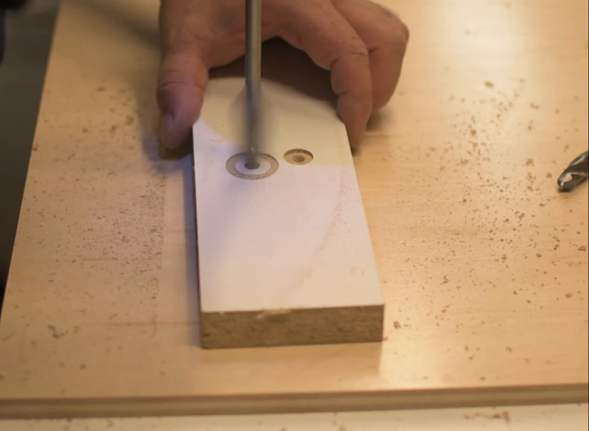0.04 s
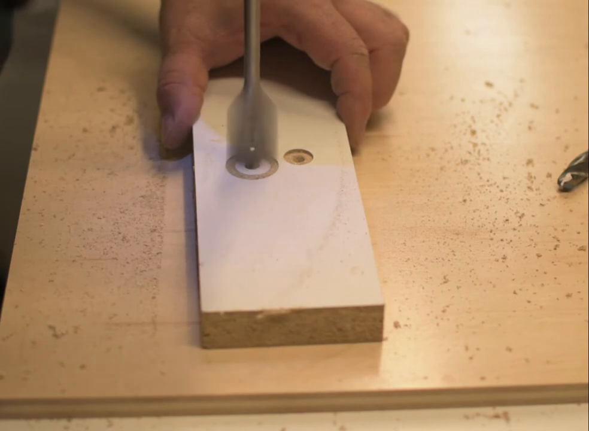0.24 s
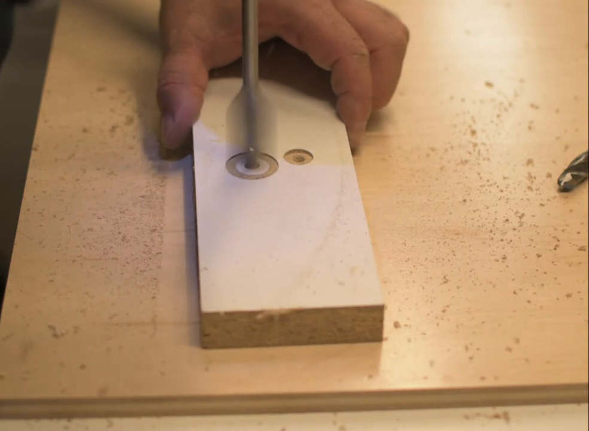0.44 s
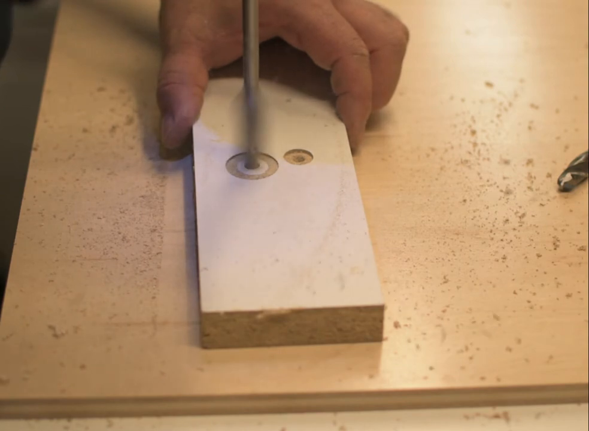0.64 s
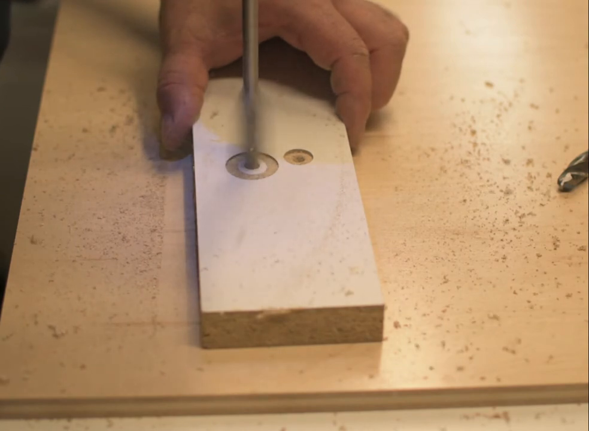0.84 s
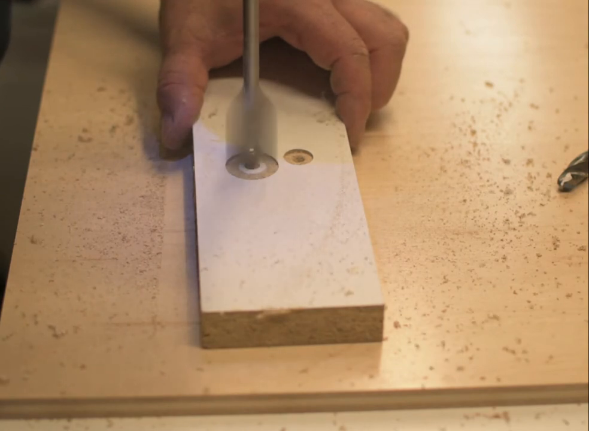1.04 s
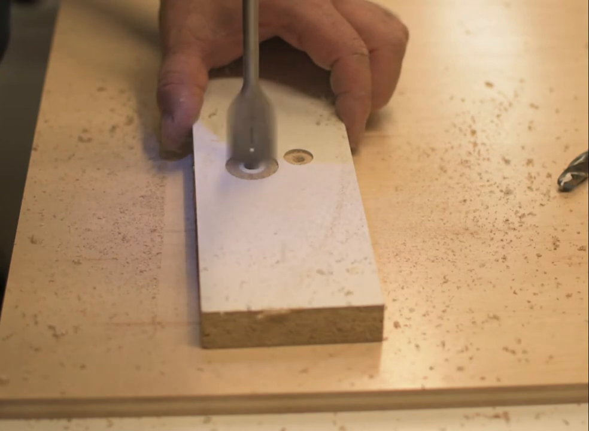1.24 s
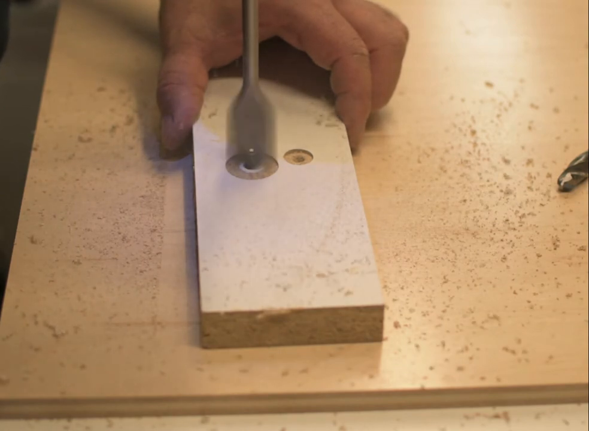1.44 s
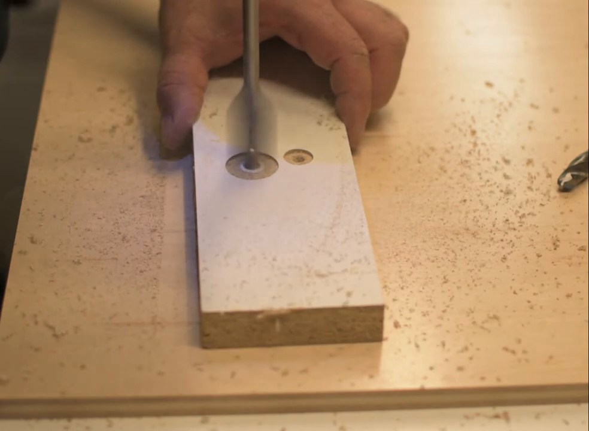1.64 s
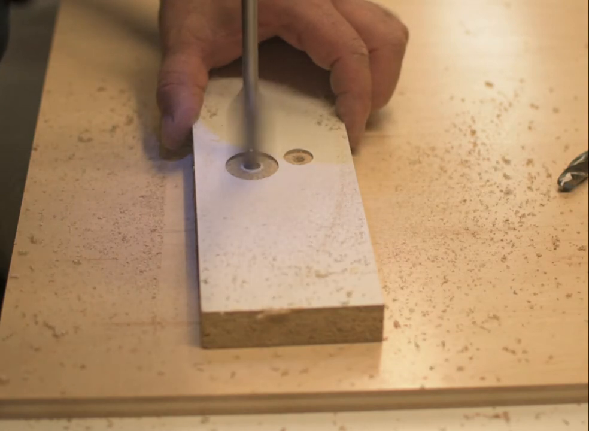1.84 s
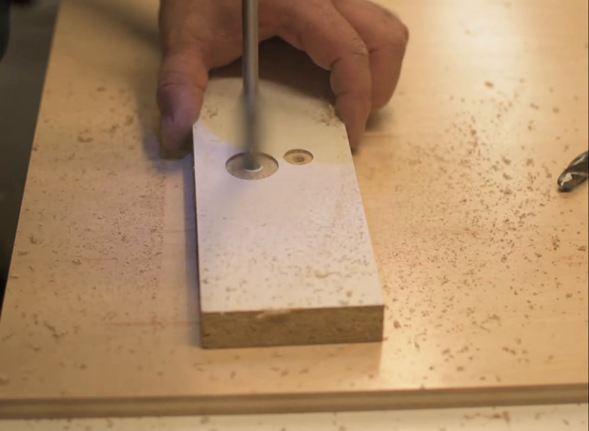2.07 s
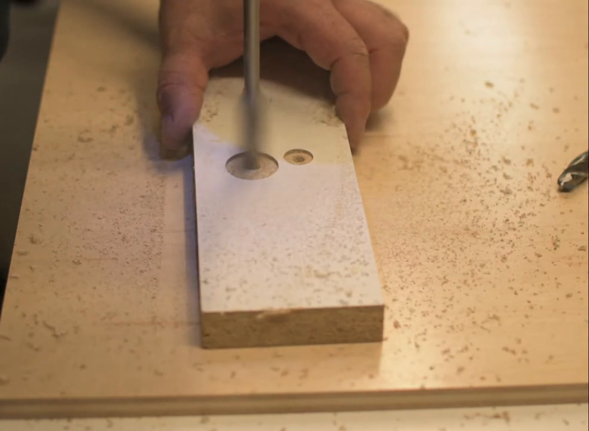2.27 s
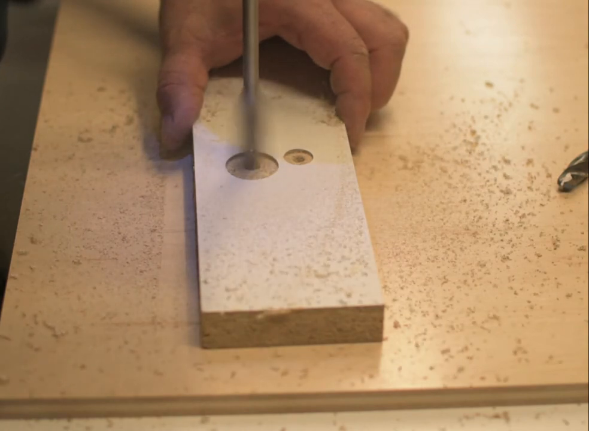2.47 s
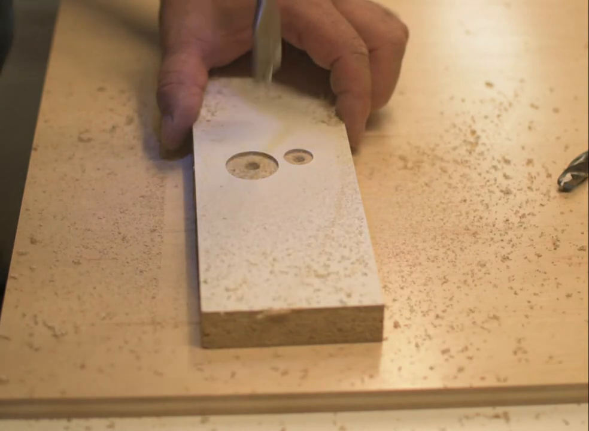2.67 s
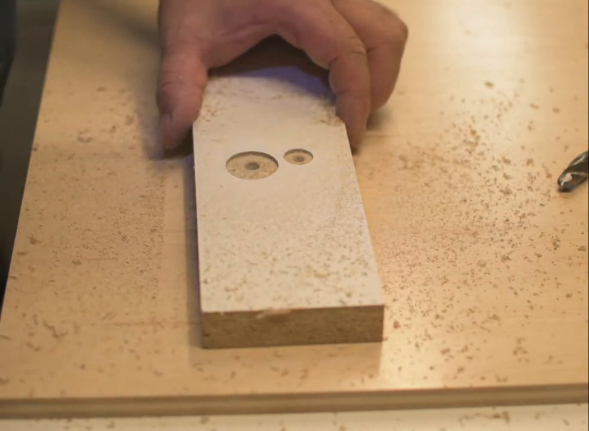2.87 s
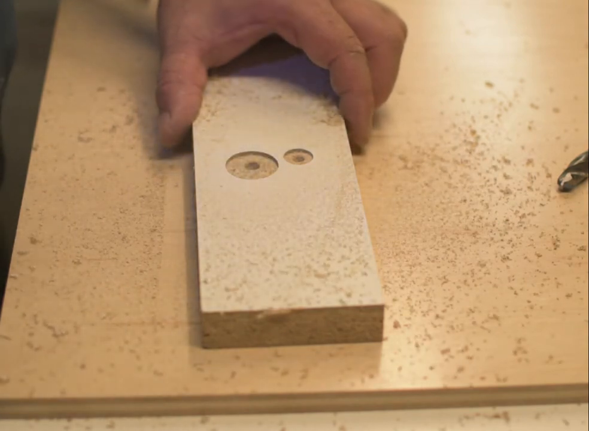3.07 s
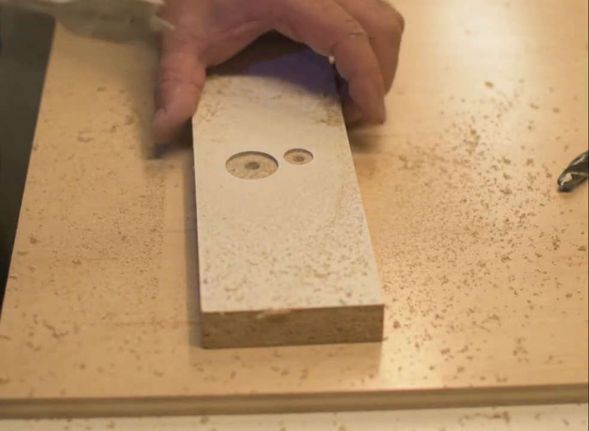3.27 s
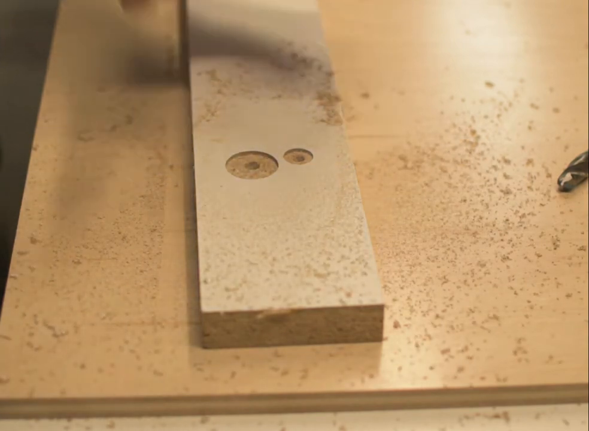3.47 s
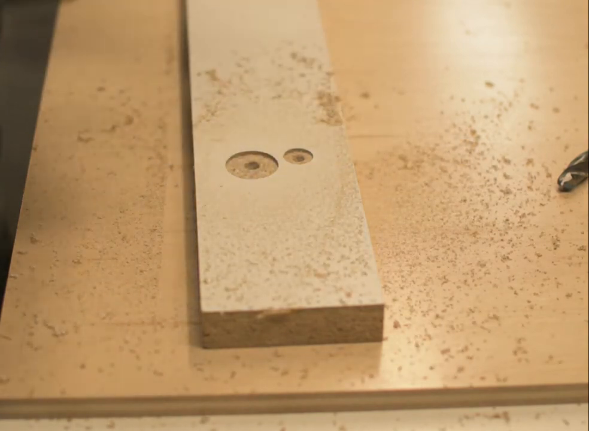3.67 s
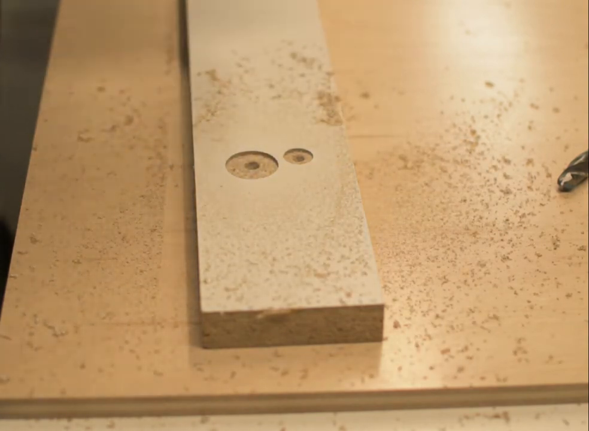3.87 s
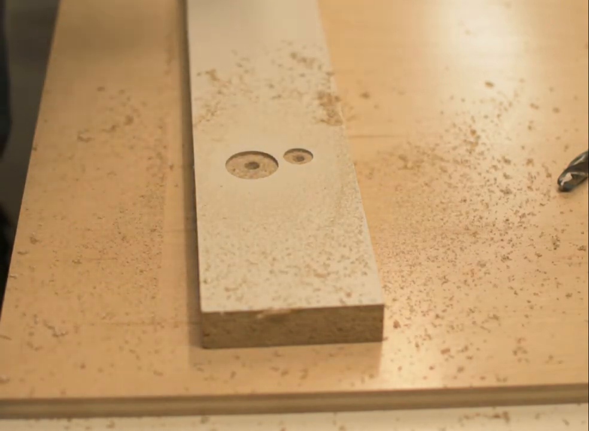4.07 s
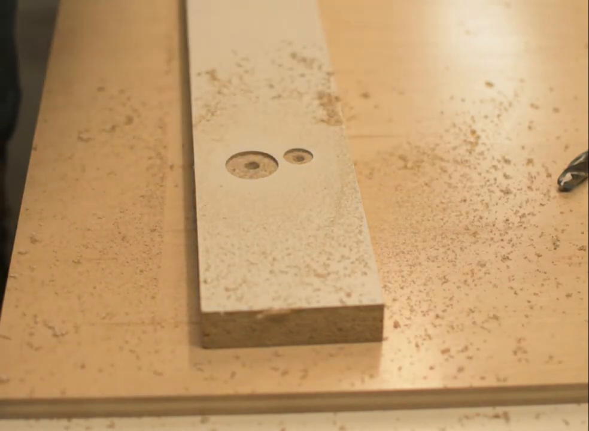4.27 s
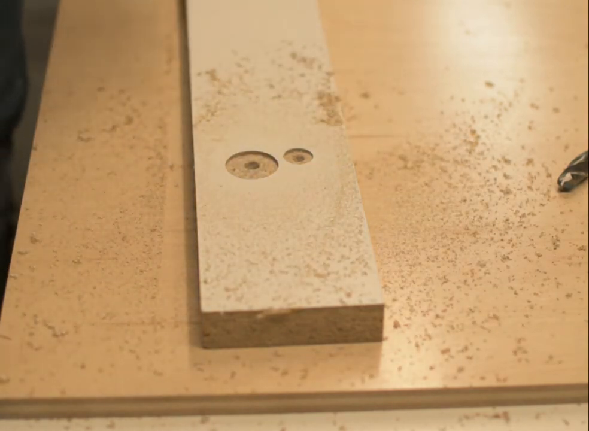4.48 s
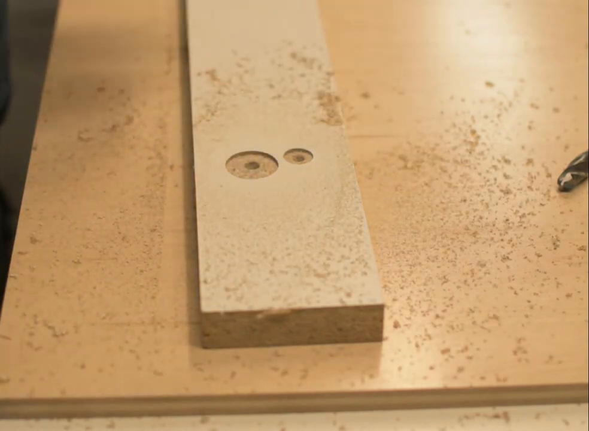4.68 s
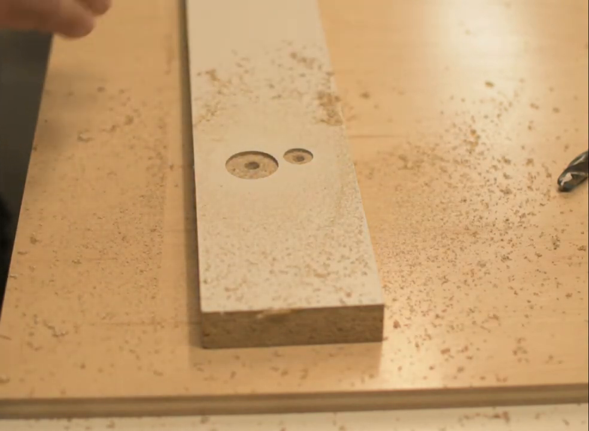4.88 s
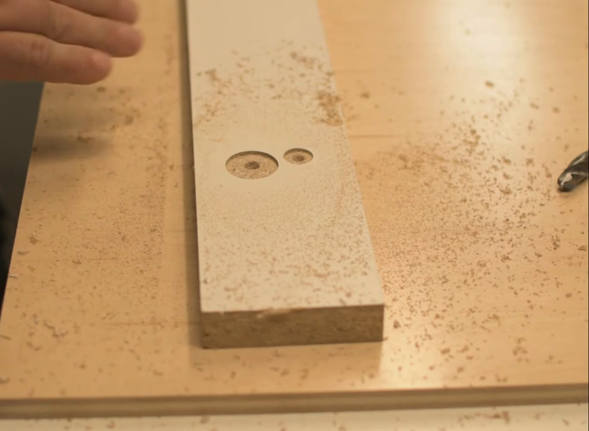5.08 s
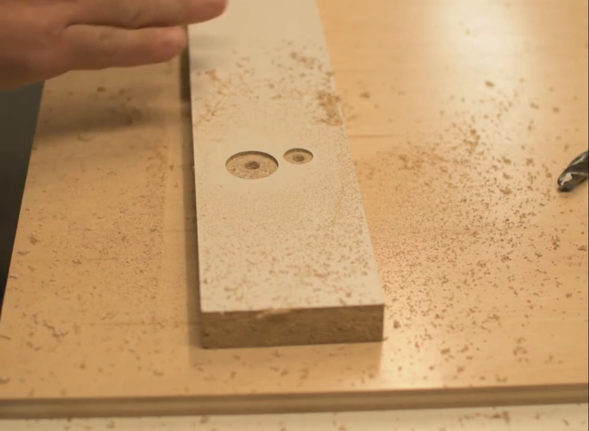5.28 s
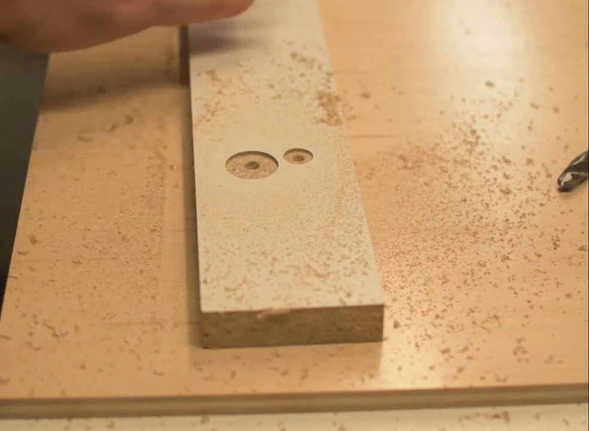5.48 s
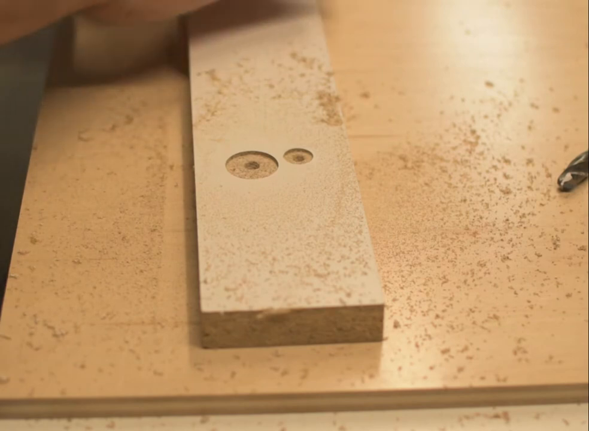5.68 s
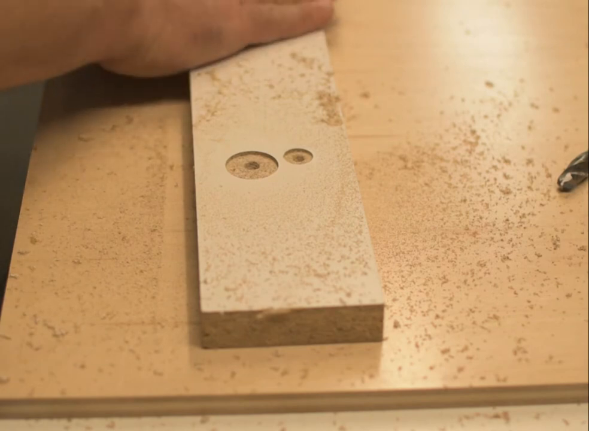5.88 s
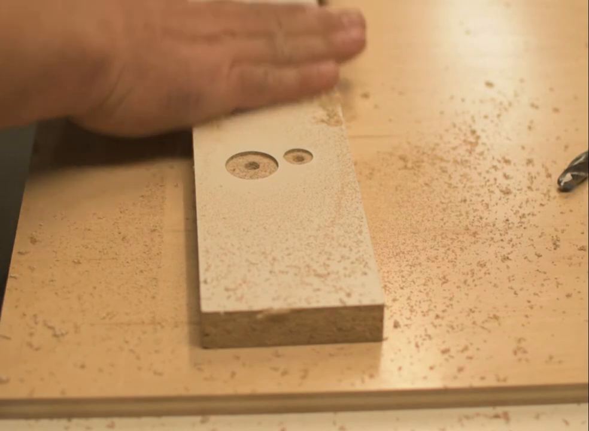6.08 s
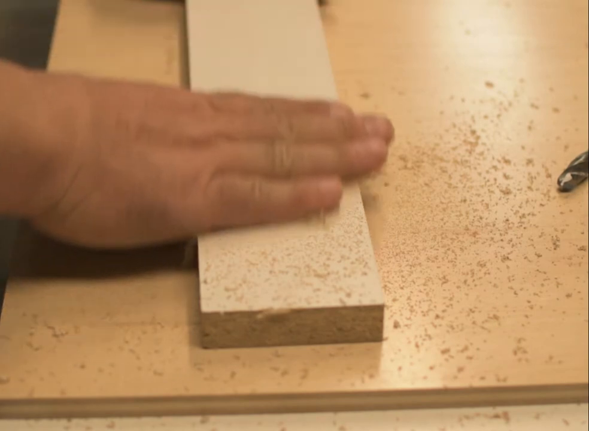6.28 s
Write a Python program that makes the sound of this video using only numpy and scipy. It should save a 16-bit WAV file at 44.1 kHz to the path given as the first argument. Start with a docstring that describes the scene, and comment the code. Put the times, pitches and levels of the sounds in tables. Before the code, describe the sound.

An electric drill whines and grinds into wood, brakes with a clack, then a few short knocks sound on a workbench.

```python
"""A hand drill boring a board with a spade bit, on the bench of a small workshop, mono microphone close by.
The motor roars and whines, the bit's two edges bite the wood in turn, its steel rings and squeals, and the
gears clack as it brakes. The drill is handled and put down, a dog barks twice far off, and a palm starts
to sweep away the sawdust. The room answers the tool and the bench; the recorder clips the loudest peaks."""
import sys
import numpy as np
from scipy import signal
from scipy.fft import rfft, irfft, next_fast_len
from scipy.io import wavfile
from scipy.ndimage import uniform_filter1d, map_coordinates

SR = 44100
rng = np.random.default_rng(int(sys.argv[2]) if len(sys.argv) > 2 else 0)


def unload_audio(sound):
    """Save the sound as a 16-bit wav file, at the path given as the first command line argument."""
    columns = np.transpose(np.atleast_2d(sound))
    # keep every value between -1 and 1, then stretch to whole-number steps
    steps = np.round(np.clip(columns, -1, 1) * 32767)
    wavfile.write(sys.argv[1], SR, steps.astype(np.int16))


N = 278712
TIME = np.arange(N) / SR
# spectrum of fan, brushes and gears: f/Hz, level/dB
ROAR_SPECTRUM = [(590, -27.5), (1000, -3.5), (1300, -12), (1600, -5), (1950, -8.5), (2680, -3.5),
                 (2910, -3), (3570, -1), (4550, -3.5), (7700, -8), (9050, -7.5), (10700, -13), (15500, -18)]
# resonances of the board: f/Hz, width/Hz, level/dB
BOARD_MODES = [(200, 19, -9.5), (511, 230, -3.5), (876, 230, 0), (1145, 150, -2.5), (1550, 92, -3.5)]


def amp(db):
    return 10 ** (np.asarray(db) / 20)


def unit(x):
    return x / np.sqrt(np.mean(x ** 2) + 1e-20)


def along(points, hz):
    """(Hz, value) points joined on a log axis."""
    f, v = np.transpose(points)
    return np.interp(np.log(hz + 1), np.log(f + 1), v)


def curves(rows):
    """One value per sample for each column after the time."""
    s, *cols = np.transpose(rows)
    return [np.interp(TIME, s, c) for c in cols]


def staged(values):
    """A value for each stage of the boring, joined in time."""
    # the bit touches, bites fully, starts to sink, is deep: t/s
    stages = (.38, .5, 1.5, 2.2)
    return np.interp(TIME, stages, values)


def wobble(rate):
    """A smooth random curve, rate knots a second."""
    coarse = TIME[::32]
    knots = rng.standard_normal(int(N * rate / SR) + 4)
    return np.interp(TIME, coarse, map_coordinates(knots, [coarse * rate]))


def filtered(x, response):
    """x through a complex frequency response."""
    m = next_fast_len(N + SR // 2)
    return irfft(rfft(x, m) * response(np.fft.rfftfreq(m, 1 / SR)), m)[..., :N]


def body(modes):
    """The causal response of a set of resonances."""
    return lambda f: sum((-1) ** k * amp(db) * 1j * f * width / (hz * hz - f * f + 1j * f * width)
                         for k, (hz, width, db) in enumerate(modes))


def noise(response, grain_db=0, grain_rate=300):
    """Noise of rms 1; its drive varies in level from grain to grain."""
    return unit(filtered(amp(grain_db * wobble(grain_rate)) * rng.standard_normal(N), response))


def hiss(spectrum, **grain):
    return noise(lambda hz: amp(along(spectrum, hz)), **grain)


def burst(t60, rise):
    """A puff of noise that rises fast and dies."""
    t = TIME[:SR // 8]
    return amp(-60 * t / t60) * (1 - np.exp(-t / rise)) * rng.standard_normal(len(t))


def drill():
    """The spindle slows under load, then brakes; the bit runs out of true and throbs once a turn."""
    # gear mesh rate: t/s, f/Hz
    speed = [(0, 2912), (.17, 2912), (.37, 2895), (.43, 2815), (.55, 2785), (.75, 2779), (.95, 2790),
             (1.13, 2779), (1.37, 2734), (1.6, 2770), (1.85, 2757), (2.09, 2725), (2.21, 2691),
             (2.33, 2693), (2.45, 2725), (2.57, 2795)]
    # by stage: roar and rumble level/dB
    roar_levels, rumble_levels = (-12, -10, -11, -10.5), (-35.5, -32, -33.5, -30)
    # by stage, for the throb and the two edges' bite: depth/dB, lead/rad
    throb_depth, throb_lead = (5, 4, 3.5, 4), (-.7, .8, .6, 1.5)
    edge_depth, edge_lead = (3.5, 3.5, 5.5, 2), (-3.1, -2.5, -1.8, -.5)
    let_go_s, stop_s, mesh_per_turn, shank_lag_rad = 2.58, 2.67, 155.5, 2.3
    braking_s = np.clip(TIME - let_go_s, 0, None)
    released = np.clip(braking_s / .0093, 0, 1)
    running = uniform_filter1d(1. * (TIME <= stop_s), size=400)
    roar_db = staged(roar_levels) - 6.5 * released + 55 * braking_s * running
    rumble_db = staged(rumble_levels) + 1.2 * wobble(6) - 80 * braking_s
    mesh_hz = curves(speed)[0] - 2200 * braking_s * running
    turn = 2 * np.pi * np.cumsum(mesh_hz) / SR / mesh_per_turn
    mesh = turn * mesh_per_turn + 2 * np.pi * np.cumsum(4 * wobble(12)) / SR
    throb = staged(throb_depth) * np.cos(turn + staged(throb_lead))
    edges, shank = (staged(edge_depth) * np.cos(2 * turn + staged(edge_lead) + lag)
                    for lag in (0, shank_lag_rad))
    steel = .6 * (throb + shank)  # the steel answers between the bites
    return running * (amp(-5.5 * released) * wood_cut(turn, throb, edges)
                      + amp(roar_db - .7) * motor_roar(steel)
                      + amp(roar_db - 12.5) * bit_ring(turn, steel)
                      + shank_squeal(steel)
                      + amp(-2 * released) * gear_whine(mesh, throb + edges)
                      + amp(rumble_db) * rumble(throb))


def grooves(turn, count=2400, renew_hz=3.5):
    """The edges meet nearly the same fibres on every turn; the pattern slowly wears into a new one."""
    pattern = rng.standard_normal((int(N * renew_hz / SR) + 3, count))
    position = turn / (2 * np.pi) % 1 * (count - 1)
    return unit(map_coordinates(pattern, [TIME * renew_hz, position], order=1))


def wood_cut(turn, throb, edges):
    """Fibres cut in pulses sound the board; its sharpest modes growl."""
    # the cut: t/s, board level/dB, growl level/dB
    cut_levels = [(0, -29, -35), (.13, -30, -35), (.3, -25, -31), (.48, -20.5, -22), (.84, -21, -20.5),
                  (.96, -19.5, -19.5), (1.15, -21, -20), (1.32, -18.5, -16.5), (1.44, -20.5, -17),
                  (1.58, -19, -15), (1.82, -19, -18), (2.04, -20, -20), (2.16, -17, -16.5), (2.4, -16, -16),
                  (2.53, -22, -23), (2.58, -23, -24)]
    # f/Hz, width/Hz, level/dB
    growl_modes = [(828.7, 49, 1), (940, 60, -1)]
    board_db, growl_db = curves(cut_levels)
    fibres = .8 * grooves(turn) + .6 * rng.standard_normal(N)
    board = unit(filtered(amp(1.2 * throb + .3 * edges) * fibres, body(BOARD_MODES)))
    bite_db = staged([1.3, .8, .7, .8]) * throb + 1.1 * edges
    growl = unit(amp(.45 * edges) * filtered(amp(bite_db) * fibres, body(growl_modes)))
    return amp(board_db) * board + amp(growl_db) * growl


def motor_roar(steel):
    """Fan, brushes and gears rush, and the housing resonates."""
    # f/Hz, width/Hz, level/dB
    housing_modes = [(2630, 300, -4.5), (3610, 190, -4), (4090, 93, -8), (6200, 160, -5), (6910, 300, -4.5)]
    roar = hiss(ROAR_SPECTRUM, grain_db=.97, grain_rate=200) + amp(-8) * noise(body(housing_modes))
    return unit(amp(.15 * steel) * roar)


def bit_ring(turn, steel):
    """The steel bit rings, chattering four times a turn."""
    # f/Hz, width/Hz, level/dB
    bit_modes = [(9020, 120, 1.5), (8600, 200, -13.5)]
    chatter_db = 3.5 * np.cos(4 * turn + .88 * wobble(11)) + 2.2 * wobble(6.6)
    return unit(amp(staged([1.4, .9, .3, .4]) * steel + chatter_db) * noise(body(bit_modes)))


def shank_squeal(steel):
    """The shank squeals in one narrow resonance while the bit cuts."""
    # f/Hz, width/Hz, level/dB
    shank_mode = [(2576, 32, 0)]
    # t/s, level/dB
    squeal_levels = [(.3, -44), (.4, -24.5), (1.9, -26.5), (2.05, -36), (2.5, -29.5)]
    squeal_db = curves(squeal_levels)[0] + 1.3 * wobble(4.3)
    return amp(squeal_db) * unit(amp(1.9 * steel) * noise(body(shank_mode)))


def gear_whine(mesh, bite):
    """Tones tied to the gear mesh; each bite chops their level and jolts their phase."""
    # each whine's multiple of the mesh rate
    orders = (.0257, .077, .1, .4, .55, .6, 1, 1.1, 1.132, 1.26, 1.395, 1.515, 1.8, 2, 2.2, 3)
    # each whine's relative level: running light/dB, under load/dB, deep in the hole/dB
    whine_levels = [(-46, -50, -44), (-48, -43, -41), (-39, -46, -46), (-39, -40, -42), (-42, -34, -38),
                    (-34, -33, -33), (-22, -26, -30), (-32, -31, -34), (-40, -32, -31), (-28, -26, -29),
                    (-33, -40, -40), (-33, -23, -26.5), (-34, -42, -42), (-25, -40, -28.5), (-42, -37, -30),
                    (-38, -42, -42)]
    jolt = staged([.3, .8, .7, .6]) * bite
    out = np.zeros(N)
    for order, (light, load, deep) in zip(orders, whine_levels):
        db = staged([light, load, load, deep]) + 3 + .5 * jolt + 1.3 * wobble(14)
        out += amp(db) * np.sin(order * (mesh + .14 * jolt) + .24 * wobble(40))
    return out


def rumble(throb):
    """The drill's low noise, swelling once a turn."""
    # f/Hz, level/dB
    rumble_spectrum = [(12, -51), (20, -20), (37, -15), (55, -11), (198, 1), (252, -7.5), (400, 2.5),
                       (520, -27.5), (880, -120)]
    return unit(amp(.4 * throb) * hiss(rumble_spectrum))


def room(x, stretch=1):
    """The workshop's reverberation, dying sooner in the treble."""
    # f/Hz, t60/s
    decay = [(100, 0.6), (1000, 0.48), (4000, 0.38), (8000, .3), (15000, 0.077)]
    hz, t, z = signal.stft(rng.standard_normal(SR), SR, nperseg=256)
    tail = signal.istft(z * amp(-60 * t / (stretch * along(decay, hz)[:, None])), SR, nperseg=256)[1]
    return signal.fftconvolve(np.pad(x, (300, 0)), tail / np.linalg.norm(tail))[:N]


def room_tone():
    """Still air, a low shuffle and an appliance's hum."""
    # f/Hz, relative level/dB
    air_spectrum, shuffle_spectrum, hum_tones = [(120, -32.5), (200, -12.5), (407, -18.5), (479, -8.5),
                                                 (535, -13), (1070, -13), (1650, -17), (4030, -18),
                                                 (10000, -26), (15500, -29.5)], [(12, -32), (20, -4), (65, 1), (145, -8.5),
                                                              (182, -9.5), (278, -17), (400, -19.5),
                                                              (520, -45), (880, -120)], [(480, -70)]
    # t/s, relative level/dB
    shuffle_levels = [(2.7, -61.5), (3.65, -57), (4.2, -58), (4.35, -54), (4.94, -57), (5.21, -46),
                      (5.64, -54), (5.87, -51.5), (6.32, -58)]
    shuffle = amp(curves(shuffle_levels)[0] + .5) * hiss(shuffle_spectrum, grain_db=1.5, grain_rate=12)
    hum = sum(amp(db + 2 + 1.5 * wobble(8)) * np.sin(2 * np.pi * hz * TIME) for hz, db in hum_tones)
    return amp(-65.5) * hiss(air_spectrum) + hum + shuffle


def gear_clacks():
    """The braking gears slam across their slack and sound through the housing and the board."""
    # t/s, relative level/dB
    slams = [(2.651, -3.5), (2.673, 4.5), (2.691, -11.5), (2.702, -0.5), (2.772, -22.5), (2.784, -26.5)]
    hits = np.zeros(N)
    for s, db in slams:
        hits[round(s * SR):][:SR // 8] += amp(db + 10) * burst(t60=.028, rise=.0033)
    housing = filtered(hits, lambda hz: amp(along(ROAR_SPECTRUM, hz)))
    return housing + amp(-9) * filtered(hits, body(BOARD_MODES))


def handling_ticks():
    """Tool, cable and fingers touch: each a tiny puff through a broad resonance."""
    # t/s, relative level/dB, centre f/Hz
    contacts = [(2.984, -40, 5260), (3.029, -41, 2205), (3.471, -41, 4020), (3.655, -43.5, 3110),
                (3.696, -41.5, 3350), (3.711, -46, 3330), (3.756, -37, 2340), (3.801, -40, 3360),
                (3.845, -37.5, 3510), (3.954, -41, 3780), (4.043, -43, 7800), (4.163, -41, 2110),
                (4.278, -40.5, 1910), (4.313, -38.5, 3560), (4.355, -41.5, 2010), (4.38, -45, 2950),
                (4.398, -47, 3280), (4.434, -40, 2090), (4.446, -36, 1520), (4.984, -36.5, 4500),
                (5.054, -44, 3500), (5.189, -35.5, 1178), (5.214, -43, 4200), (5.251, -35, 1300),
                (5.806, -47.5, 2816), (5.833, -45.5, 3700)]
    out = np.zeros(N + SR)
    for s, db, hz in contacts:
        puff = signal.lfilter(*signal.iirpeak(hz, 1.6, SR), burst(t60=.025, rise=.0009))
        puff = signal.lfilter(*signal.iirpeak(hz, .55, SR), puff)
        out[round(s * SR):][:SR // 8] += amp(db - 3.5) * puff / np.abs(puff).max()
    return out[:N]


def distant_dog():
    """Three hoarse partials that swell, sag in pitch and fade, blurred by echo."""
    # t/s, length/s, pitch f/Hz, level/dB, third partial/dB
    barks = [(3.347, 0.14, 509.4, -48.5, -22), (5.896, .17, 482, -45, -10)]
    sag_hz, swell_db, second_db = 20, 14, -8
    out = np.zeros(N)
    for s, length, hz, db, third_db in barks:
        progress = (TIME - s) / length
        swell = np.interp(progress, [0, .45, 1], [0, 1, 0])
        pitch_hz = hz - sag_hz * np.clip(progress - .5, -1, 1)
        phase = 2 * np.pi * np.cumsum(pitch_hz) / SR + .9 * wobble(70)
        voice = sum(amp(level + 3.8 * wobble(50)) * np.sin(k * phase)
                    for k, level in enumerate((0, second_db, third_db), 1))
        out += np.clip(swell * 10, 0, 1) * amp(db - swell_db * (1 - swell)) * voice
    return out + amp(-5) * room(out, stretch=1.3)


def hands():
    """Bench scuffs and sleeve rustle swell with each move; the palm lands on the dust and speeds up."""
    # middle t/s, half length/s, scuff level/dB, sleeve level/dB
    moves = [(3.5, .08, -64, -72.5), (3.68, .05, -66, -68), (3.84, .06, -57, -59), (4.1, .08, -70, -62.5),
             (4.25, .08, -62, -61), (4.37, .05, -64, -72), (4.487, .09, -60, -73.5), (4.72, 0.14, -73, -75),
             (5.14, .11, -66, -64), (5.69, 0.086, -69, -67.5), (5.898, .08, -63.5, -68.5)]
    # f/Hz, level/dB
    scuff_spectrum, sleeve_spectrum, dust_spectrum = [(500, -39.5), (900, 3.5), (2000, -3), (3800, 0),
                                                      (5000, -27), (8000, -39.5)], [(2500, -42), (4500, -9.5),
                                                                     (8000, -2.5), (12000, -2.5),
                                                                     (15500, -4)], [(200, -13.5),
                                                                                    (900, -14.5),
                                                                                    (1750, -12.5),
                                                                                    (2900, -5.5),
                                                                                    (3700, 0.5), (4600, -7),
                                                                                    (8000, -6), (12700, -9),
                                                                                    (15500, -16)]
    scuff, sleeve = np.zeros((2, N))
    for s, half, scuff_db, sleeve_db in moves:
        swell = np.exp(-((TIME - s) / half) ** 2)
        scuff += amp(scuff_db) * swell
        sleeve += amp(sleeve_db) * swell
    scuff *= hiss(scuff_spectrum, grain_db=2, grain_rate=25)
    sleeve *= hiss(sleeve_spectrum, grain_db=2.5, grain_rate=40)
    sweeping_s = np.clip(TIME - 5.934, 0, None)
    palm_db = -40.5 - 23.5 * np.exp(-sweeping_s / .054)
    palm = (sweeping_s > 0) * amp(palm_db) * hiss(dust_spectrum, grain_db=1, grain_rate=480)
    return scuff + sleeve + palm


def bench_knocks():
    """A crack, each blow with its own brightness; the bench top rings just after, differently at every blow."""
    # t/s, crack level/dB, thud level/dB, crack cutoff f/Hz
    blows = [(3.878, -12.5, -56, 9200), (3.899, -27.5, -57, 5080), (3.914, -39, -62, 2500),
             (4.8657, -7, -12, 1199), (4.9, -25, -29, 1490), (4.939, -36, -35, 900),
             (5.163, -34.5, -33.5, 600), (5.17, -32, -41, 700), (5.2, -41, -42.5, 900),
             (5.245, -33.5, -43.5, 903)]
    # f/Hz, level/dB, t60/s
    bench_modes = [(88, -3.5, 0.19), (123, -6, 0.073), (186, -1, 0.068), (255, -6, 0.039), (555, -8, 0.061),
                   (722, -13, 0.07), (920, -10, 0.048), (1114, -15.5, 0.053)]
    # f/Hz, level/dB
    crack_spectrum = [(200, -18), (400, -1.5), (1200, -0.5), (3000, -3.5), (8000, -7.5), (15500, -9.5)]
    thud, crack = np.zeros((2, N + SR))
    t = TIME[:SR // 2]
    for s, crack_db, thud_db, cutoff_hz in blows:
        ring = sum(amp(db + rng.normal(0, 2) - 60 * t / t60) * np.sin(2 * np.pi * hz * t)
                   for hz, db, t60 in bench_modes)
        thud[round((s + .004) * SR):][:len(t)] += amp(thud_db) * ring
        puff = signal.lfilter(*signal.butter(1, cutoff_hz, fs=SR), burst(t60=.047, rise=.0008))
        crack[round(s * SR):][:SR // 8] += amp(crack_db) * puff / np.abs(puff).max()
    return thud[:N] + filtered(crack[:N], lambda hz: amp(along(crack_spectrum, hz)))


def scene():
    """Tool and bench close up with a little room, the dog far off; both channels alike."""
    tool = drill() + gear_clacks()
    bench = bench_knocks() + handling_ticks()
    reverb = amp(-16.5) * room(tool) + amp(-12.5) * room(bench)
    mono = tool + bench + reverb + distant_dog() + hands() + room_tone()
    return np.array([mono, mono])


def record(dry):
    """The microphone drops the deepest bass; the recorder flattens peaks and cuts the top treble."""
    top_hz, edge_hz = 15660, 25
    heard = signal.sosfilt(signal.butter(2, 45, "high", fs=SR, output="sos"), dry)
    flat = heard / (1 + np.abs(heard / .98) ** 8) ** (1 / 8)
    return np.clip(filtered(flat, lambda hz: .5 - .5 * np.tanh((hz - top_hz) / edge_hz)), -1, 1)


dry = scene()
out = record(dry)
unload_audio(out)
```